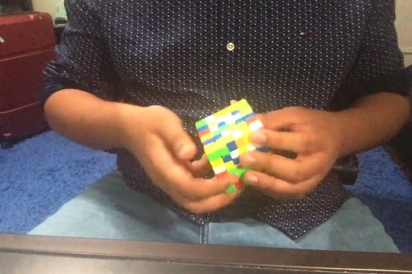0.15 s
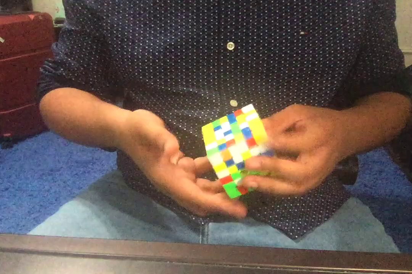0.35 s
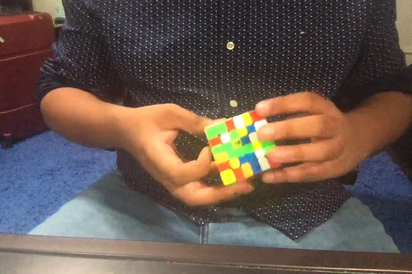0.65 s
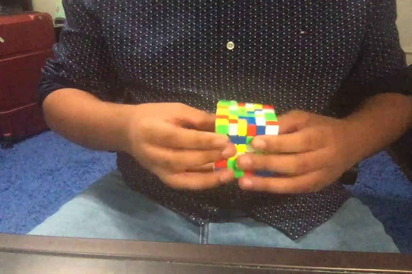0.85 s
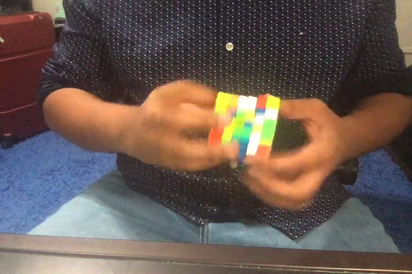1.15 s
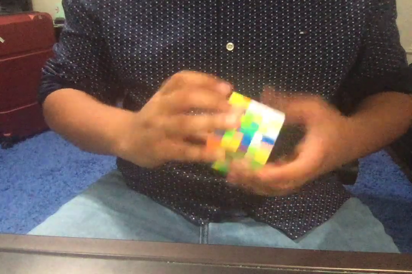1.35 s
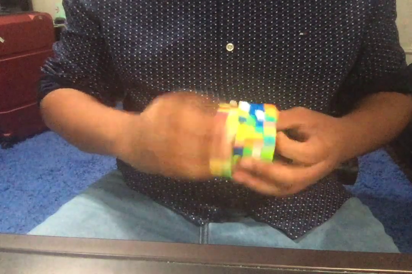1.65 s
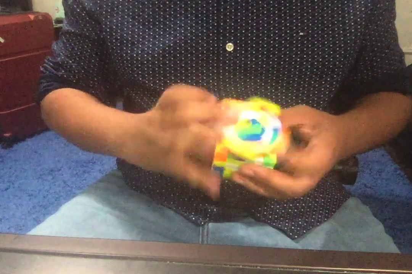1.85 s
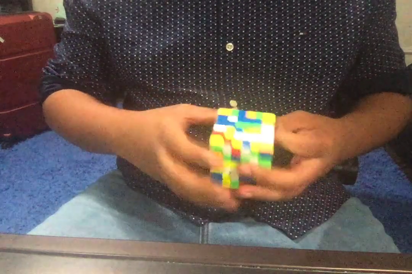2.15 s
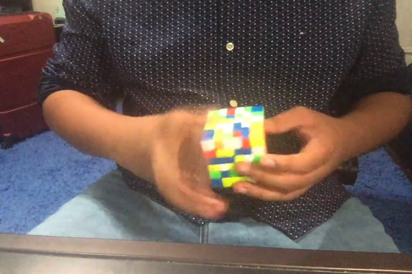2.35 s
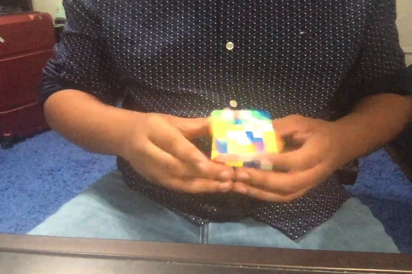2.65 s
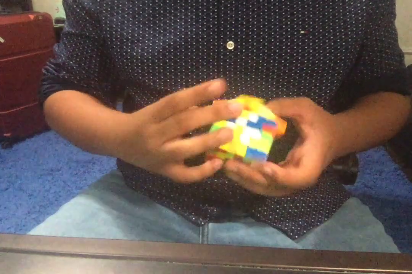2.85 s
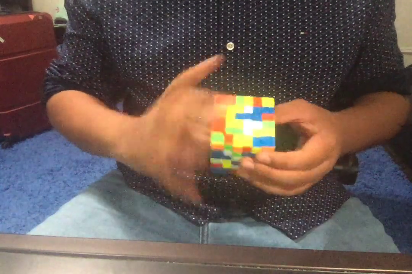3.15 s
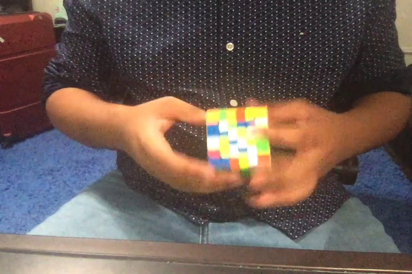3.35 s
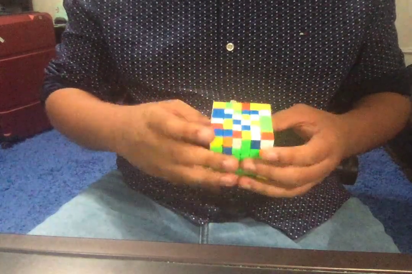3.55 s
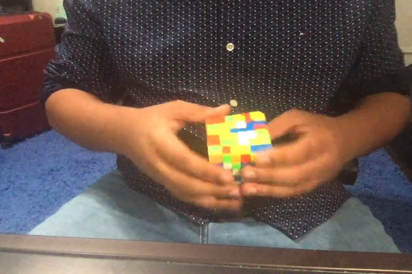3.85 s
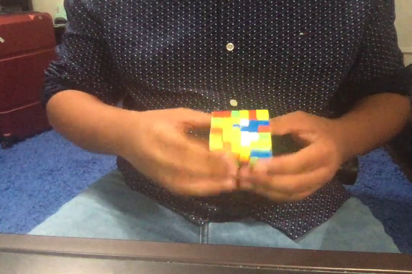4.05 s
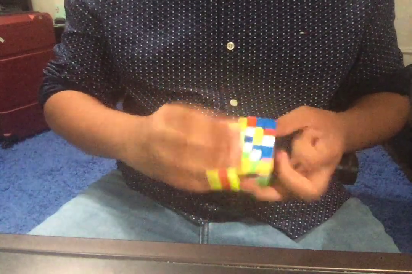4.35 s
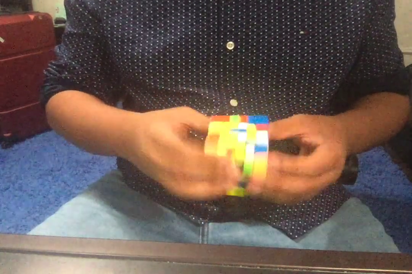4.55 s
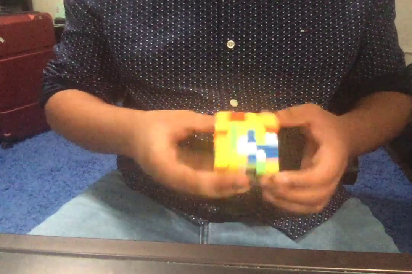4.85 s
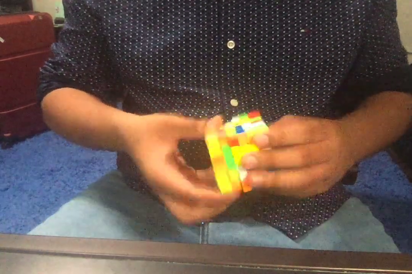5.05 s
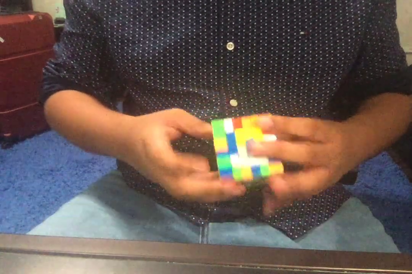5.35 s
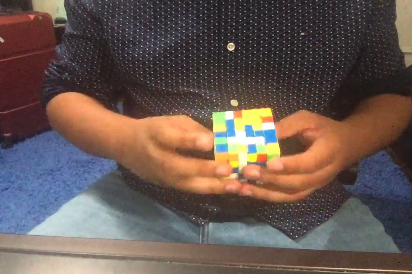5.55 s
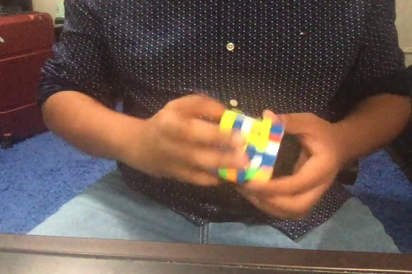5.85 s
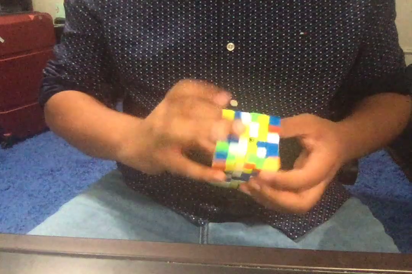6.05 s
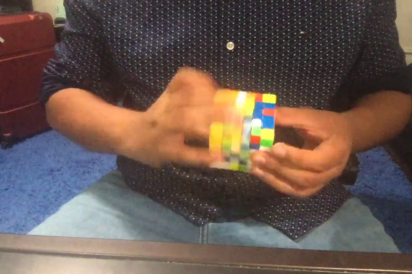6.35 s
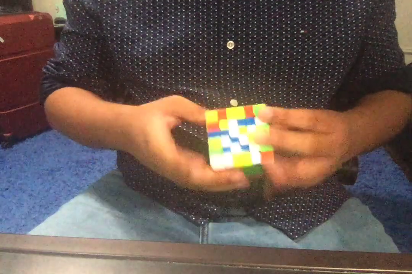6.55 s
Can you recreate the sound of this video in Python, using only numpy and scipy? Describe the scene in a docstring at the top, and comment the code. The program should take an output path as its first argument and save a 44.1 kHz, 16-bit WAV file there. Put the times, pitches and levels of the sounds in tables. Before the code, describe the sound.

Quick flurries of sharp plastic clicks and clacks come from a puzzle cube twisted close by, with a low traffic rumble outside.

```python
"""Puzzle cube and distant traffic

A plastic puzzle cube is turned fast by hand, close by in a furnished room. Each turn drags the
small pieces over one another: a dense rattle of tiny impacts, with louder snaps as pieces catch.
The edges tick, while the walls of the pieces and the air inside the cube resonate.
Far traffic comes through the walls of the room and booms in its low modes."""
import sys
import numpy as np
from scipy import signal
from scipy.fft import rfft, irfft, next_fast_len
from scipy.io import wavfile
from scipy.ndimage import map_coordinates

SR = 44100
rng = np.random.default_rng(int(sys.argv[2]) if len(sys.argv) > 2 else 0)


def to_wav(sig):
    """Store sig (one row per channel, or 1-D mono) as 16-bit WAV at the path in sys.argv[1].

    Samples outside -1..1 are clipped; the rate is SR.
    """
    pcm = np.clip(np.atleast_2d(sig), -1, 1) * 32767
    pcm = np.round(pcm).astype(np.int16)
    wavfile.write(sys.argv[1], SR, pcm.T)  # frames by channels


N = 295029

# Levels in the tables are relative: each source applies its own gains and filters.
# Turns of a layer: (time of full speed [s], hold [s], tick level [dB], shell over ticks [dB],
# core over ticks [dB], gain of the small walls as the fingers free or damp them [dB])
LAYER_TURNS = [(0.004, 0.02, -57, -4.5, -28, -5.5), (0.059, 0.034, -53, -3, -10.5, -4),
               (0.252, 0.016, -54.5, 4.5, -5.5, -3.5), (0.433, 0.0037, -47, 1.5, -6.5, -3.5),
               (0.582, 0.0022, -56, 5, -8.5, -9.5), (0.977, .015, -48.5, 1, -8.5, -8.5),
               (1.047, 0.0022, -47.5, 3.5, -4.5, -3), (1.211, 0.044, -38, -3, -12.5, -0.5),
               (1.395, .03, -80, -3, -19, -7), (1.535, .003, -61.5, 1, -18, -10.5),
               (1.686, 0.019, -50.5, 0.5, -13.5, -11), (1.778, 0.0034, -50, -4, -14, -11),
               (1.821, .004, -43, 2.5, -13.5, -7.5), (1.902, 0.022, -54.5, 0, -15.5, -8),
               (2.068, 0.0011, -61, -3, -23, -5), (2.14, 0.011, -76, 1.5, -20, -6),
               (2.233, 0.012, -79, -8, -20, -5), (2.333, 0.0041, -77.5, 4, -20, -10),
               (2.719, .012, -56, 1, -9.5, -13.5), (2.786, .022, -51.5, 2.5, -16.5, -6.5),
               (2.898, .001, -53, 0, -8, -6.5), (3.117, 0.0022, -41.5, -4.5, -12, 1.5),
               (4.115, 0.0048, -53, -0.5, -20, -5.5), (4.255, .001, -45.5, 0, -11.5, -7.5),
               (4.327, .001, -39.5, 2, -13, -8), (4.402, 0.00083, -46.5, -1, -13, -9),
               (4.609, 0.01, -53.5, 4.5, -16, -11.5), (4.757, 0.027, -66, -0.5, -8, -4),
               (4.861, .001, -44.5, 1.5, -15.5, -5.5), (5.027, 0.021, -79, -7, -18, -3),
               (5.113, 0.06, -46, -2, -6, -0.5), (5.798, 0.00086, -50.5, -2, -20, -3.5),
               (5.907, .003, -53.5, -3.5, -20, 1.5), (5.949, .001, -49, -10, -16, -4.5),
               (6.035, 0.017, -48, -0.5, -25, -3), (6.123, .005, -42.5, -3.5, -13, -11),
               (6.146, 0.032, -48, 1.5, -10.5, -6), (6.316, 0.0076, -40.5, -3, -16.5, 2),
               (6.352, 0.022, -47, 0, -18.5, -2.5)]
# Pieces catching, and lone ticks between turns: (time [s], tick level [dB], knock level [dB])
SNAP_EVENTS = [(0.0153, -38, -35.5), (0.026, -37.5, -43), (0.078, -46, -49), (0.091, -44, -49),
               (0.2407, -43, -60), (0.2491, -44, -33.5), (0.2525, -35, -33.5), (0.2675, -30, -37.5),
               (0.304, -50, -69), (0.3295, -45, -55), (0.3368, -51, -65), (0.4013, -60, -61),
               (0.42, -50, -57), (0.4313, -51, -40), (0.446, -36, -39), (0.568, -43.5, -53),
               (0.5909, -47, -47), (0.6015, -39, -48), (0.852, -66, -64), (0.9739, -38, -41.5),
               (0.983, -40, -37), (0.9928, -43, -38), (1.0188, -32.5, -35), (1.042, -41, -52),
               (1.05, -33, -44.5), (1.0684, -34, -51), (1.0973, -36.5, -48.5), (1.2055, -30.5, -38.5),
               (1.2138, -26.5, -33), (1.216, -32.5, -31.5), (1.2268, -25.5, -32.5), (1.242, -24.5, -39),
               (1.389, -68, -60), (1.4137, -65, -61.5), (1.5356, -56.5, -47), (1.5571, -43.5, -39.5),
               (1.5931, -49, -48), (1.6412, -52, -49), (1.674, -54, -66), (1.6868, -26, -37),
               (1.691, -38, -59), (1.7026, -34, -33.5), (1.777, -43, -51), (1.805, -47, -35),
               (1.8255, -32, -37), (1.8286, -33, -33), (1.8435, -38, -35), (1.8473, -41, -34),
               (1.892, -35.5, -57), (1.92, -34.5, -29.5), (1.9413, -39, -43), (1.975, -54, -60),
               (1.983, -53, -62), (2.0634, -42.5, -71), (2.0753, -59.5, -40), (2.1016, -50, -69),
               (2.142, -57, -58), (2.2302, -57.5, -66), (2.2474, -61.5, -69), (2.3337, -58.5, -50.5),
               (2.701, -59, -62), (2.722, -59, -36), (2.7292, -38.5, -43), (2.7487, -46, -65),
               (2.758, -53, -36), (2.776, -42.5, -46), (2.786, -38.5, -42), (2.7983, -57, -37.5),
               (2.8081, -35, -35), (2.8115, -33.5, -34), (2.8758, -53, -52), (2.8934, -36, -50),
               (2.9086, -36, -36.5), (3.018, -65, -70), (3.086, -38.5, -51), (3.1, -43, -60),
               (3.1157, -37, -37.5), (3.1232, -35.5, -34.5), (3.1258, -23, -39), (3.3633, -49, -60),
               (3.4433, -68.5, -62), (4.099, -61, -71), (4.1081, -42, -69), (4.1148, -37, -43.5),
               (4.1354, -42, -68), (4.1452, -39, -46), (4.1712, -36.5, -38.5), (4.2427, -42, -56),
               (4.251, -40.5, -37.5), (4.2646, -38, -35), (4.3113, -53, -73), (4.3231, -35.5, -29),
               (4.332, -34.5, -40), (4.3364, -32.5, -48), (4.3962, -52, -36.5), (4.409, -28.5, -44),
               (4.604, -53, -48), (4.611, -49, -47), (4.6985, -57.5, -59), (4.7356, -54.5, -57),
               (4.7714, -45, -47.5), (4.7893, -53.5, -53), (4.8505, -37, -46), (4.8631, -32, -37),
               (5.006, -60, -68), (5.0297, -53.5, -60), (5.0567, -53.5, -78), (5.0982, -47, -58),
               (5.119, -31.5, -38), (5.1344, -42, -34), (5.15, -26.5, -34), (5.155, -36, -65),
               (5.1707, -36, -43), (5.1787, -33, -38.5), (5.4063, -58.5, -68), (5.7227, -57, -72),
               (5.791, -43.5, -54), (5.8037, -58, -44), (5.8159, -40, -56), (5.8974, -48, -59),
               (5.912, -39, -57), (5.932, -41, -50), (5.9536, -34.5, -38), (6.0243, -34.5, -47.5),
               (6.0564, -47, -46), (6.073, -44, -49), (6.117, -24.5, -31), (6.1736, -44, -41),
               (6.178, -28.5, -37), (6.1918, -34, -45), (6.2306, -58, -53.5), (6.258, -28.5, -45.5),
               (6.3123, -29, -54), (6.3254, -24, -36.5), (6.3535, -24, -48), (6.3603, -35, -39.5),
               (6.6468, -71.5, -84.5)]
# Spectrum of the ticking edges: (frequency [Hz], level [dB])
EDGE_SPECTRUM = [(1500, -90), (5000, -28.5), (6800, -11.5), (8500, -10), (9800, 0.5), (10800, -2.5),
                 (12200, 4.5), (15600, 0.5), (16000, -28.5), (16800, -42.5)]
# Modes of the shell, the walls of the pieces: (frequency [Hz], width per filter stage [Hz], level [dB])
SHELL_MODES = [(3030, 1250, -8.5), (3705, 937, -2), (4824, 1410, -3), (5810, 1700, -9.5)]
# Modes of the core, the air in the cube: (frequency [Hz], width per filter stage [Hz], level [dB])
CORE_MODES = [(1347, 850, -11), (1528, 720, -2), (2007, 1200, -3.5)]
# Echoes from near surfaces: (delay [s], level [dB])
REFLECTIONS = [(.0018, -14.5), (.0043, -12), (.0071, -34)]
# Reverberation of the room: (frequency [Hz], time to fall 60 dB [s])
REVERB_TIMES = [(1000, 0.16), (3500, 0.22), (8000, 0.24), (15000, 0.085)]
# Course of the traffic: (time [s], boom level [dB], deep boom level [dB], tyre roar level [dB])
TRAFFIC_LEVELS = [(0.0, -67, -79, -72), (0.97, -71, -80, -76), (1.1, -69, -78, -73.5),
                  (1.9, -67, -71.5, -70.5), (2.44, -67, -73.5, -74), (2.7, -72.5, -83.5, -79),
                  (2.8, -66, -74, -70), (3.32, -60.5, -75.5, -71), (3.5, -50.5, -57.5, -73),
                  (3.72, -63.5, -75, -77.5), (4.08, -68, -81, -76.5), (4.3, -63.5, -67, -69),
                  (5.18, -62, -66, -69.5), (5.72, -65.5, -72.5, -77.5), (6.12, -49.5, -56, -69),
                  (6.19, -66, -62.5, -69.5), (6.47, -50.5, -56, -70.5), (6.69, -57.5, -62.5, -75)]
# Low room modes: (frequency [Hz], width [Hz], level [dB])
BOOM_MODES = [(168, 26, -7.5), (179.9, 12.3, 2), (208.4, 5.3, -3.5), (223, 14.7, -4)]
# Lowest room modes: (frequency [Hz], width [Hz], level [dB])
DEEP_MODES = [(60, 17, -13.5), (91.2, 58, -16), (121.8, 12, 2.5)]
# Spectrum of the tyre roar: (frequency [Hz], spectral density level [dB])
TYRE_SPECTRUM = [(150, -12), (260, -7), (349, -8.5), (444, -2), (565, -17.5), (884, -8.5), (1110, -12),
                 (1950, -14.5), (2320, -16.5), (3570, -22), (7120, -34.5), (9540, -46.5), (11500, -40.5),
                 (16000, -49)]
# A vehicle pulling away: (time [s], firing frequency [Hz], level [dB], second harmonic level [dB])
ENGINE_TRACK = [(2.72, 72.3, -86, -77), (2.886, 74.3, -81.5, -74.5), (3.556, 78.04, -71, -56),
                (4.0, 80.6, -89, -72.5)]
# Gears of a passing car: (time [s], frequency [Hz], level [dB])
GEAR_TRACK = [(4.3, 930, -100), (4.4, 918, -80), (5.3, 892, -82), (5.7, 850, -100)]

RISE_DB_PER_S = 1299.5  # a finger flicks the layer up to speed
# As the layer slows, the lower-pitched parts die away later.
EDGE_FALL_DB_PER_S, SHELL_FALL_DB_PER_S, CORE_FALL_DB_PER_S = 539.5, 463.5, 379.5
BAND_LIMIT_HZ = 16900


def turns():
    """Sliding contact: the rattle follows the force of each turn and dies between turns."""
    _, _, tick_db, shell_db, core_db, _ = np.transpose(LAYER_TURNS)
    ticks = rattle(per_s=1100, spread_db=3.5, t60=0.0032, rub=0.1)
    shell = rattle(per_s=300, spread_db=3, t60=0.004, rub=0.5)
    core = rattle(per_s=150, spread_db=-5, t60=0.0079, rub=0.8)
    return cube_body(turn_force(tick_db, EDGE_FALL_DB_PER_S) * ticks,
                     turn_force(tick_db + shell_db, SHELL_FALL_DB_PER_S) * shell,
                     turn_force(tick_db + core_db, CORE_FALL_DB_PER_S) * core)


def turn_force(levels_db, fall_db_per_s):
    """Superposed envelopes: each turn grows exponentially, holds, then decays exponentially."""
    lead = SR // 10
    force, t = np.zeros(N + SR), np.arange(-lead, SR // 2) / SR
    rise_db = RISE_DB_PER_S * np.minimum(t, 0)
    for (time, hold, *_), db in zip(LAYER_TURNS, levels_db):
        fall_db = fall_db_per_s * np.maximum(t - hold, 0)
        force[round(time * SR):][:len(t)] += amp(db + rise_db - fall_db)
    return force[lead:][:N]


def rattle(per_s, spread_db, t60, rub):
    """Shot noise: random impacts of uneven strength, over the steady friction of sliding faces."""
    hits = rng.random(N) < per_s / SR
    strength = amp(spread_db * np.minimum(rng.exponential(size=N), 2))
    impacts = unit(chatter(hits * strength, t60))
    return unit(impacts + rub * rng.standard_normal(N))


def snaps():
    """Impulse excitation: a catching piece gives a tick and a sharp blow, and both chatter on."""
    times, tick_db, knock_db = np.transpose(SNAP_EVENTS)
    onsets = np.round(times * SR).astype(int)
    tick = np.bincount(onsets, amp(tick_db), N)
    knock = np.bincount(onsets, amp(knock_db), N)
    shell = amp(11.5) * knock + amp(-1.5) * chatter(knock, t60=0.0092)
    edges = amp(6.5) * tick + chatter(tick, t60=0.0068)
    core_share_db = turn_setting(column=4) - turn_setting(column=3)  # core over shell, as in the rattle
    core = amp(np.minimum(core_share_db, -6)) * shell
    return amp(-2.5) * cube_body(edges, shell, core)


def chatter(blows, t60):
    """Exponential decay: each blow starts a noise burst that falls 60 dB in t60 seconds."""
    decay = amp(-60 * np.arange(SR // 20) / SR / t60)
    return signal.fftconvolve(blows, decay)[:N] * np.sign(rng.standard_normal(N))


def cube_body(ticks, shell, core):
    """Source and filter: sharp edges tick highest, the walls knock, the hollow core answers lowest."""
    walls = ringing(shell, SHELL_MODES, waver_db=3.0, grip_db=turn_setting(column=5))
    cavity = ringing(core, CORE_MODES, waver_db=1.5)
    edges = filtered(ticks, lambda f: amp(log_interp(EDGE_SPECTRUM, f)))
    return edges + amp(-2) * (walls + cavity)


def ringing(drive, table, waver_db, grip_db=0):
    """Forced resonance: mode levels waver as loose pieces shift; the small walls follow the grip."""
    sound = np.zeros(N)
    for k, (hz, width, db) in enumerate(table):
        small_wall = hz > 4500
        gain = amp(db + waver_db * wobble(30) + grip_db * small_wall)
        sound += (-1) ** k * gain * filtered(drive, bandpass(hz, width, stages=3))
    return sound


def turn_setting(column):
    """Sample and hold: a column of LAYER_TURNS, stepping 30 ms before each turn reaches full speed."""
    table = np.array(LAYER_TURNS)
    current = np.searchsorted(table[:, 0] - 0.03, np.arange(N) / SR) - 1
    return table[np.maximum(current, 0), column]


def room(x):
    """Reflection and absorption: near surfaces echo, then each frequency decays at its own rate."""
    early = sum(amp(db) * np.pad(x, (round(delay * SR), 0))[:N] for delay, db in REFLECTIONS)
    hz, t, noise = signal.stft(rng.standard_normal(SR // 2), SR, nperseg=256)
    decay = amp(-60 * t / log_interp(REVERB_TIMES, hz)[:, None])
    tail = signal.istft(noise * decay, SR, nperseg=256)[1]
    late = signal.fftconvolve(np.pad(x, (200, 0)), tail / np.linalg.norm(tail))[:N]
    return x + early + amp(-14) * late


def traffic():
    """Standing waves: engine noise booms in the room modes, while tyre roar swells as cars pass."""
    boom_db, deep_db, roar_db = curves(TRAFFIC_LEVELS)
    boom = filtered(amp(1.3 * wobble(11)) * rng.standard_normal(N), modes(BOOM_MODES))
    boom = filtered(boom, bandpass(hz=185, width=150, stages=2))
    deep = filtered(rng.standard_normal(N), modes(DEEP_MODES))
    deep = filtered(deep, bandpass(hz=100, width=150, stages=2))
    tyre_noise = amp(0.47 * wobble(9)) * rng.standard_normal(N)
    roar = filtered(tyre_noise, lambda f: amp(log_interp(TYRE_SPECTRUM, f)))
    return amp(boom_db - 1) * unit(boom) + amp(deep_db) * unit(deep) + amp(roar_db + 3.5) * unit(roar)


def engine():
    """Periodic firing: a fundamental and its octave rise in pitch as a vehicle pulls away."""
    firing_hz, db, octave_db = curves(ENGINE_TRACK)
    return tone(firing_hz, db, waver_db=-1.0) + tone(2 * firing_hz, octave_db, waver_db=0.0)


def gears():
    """Gear meshing: a passing car gives a faint, falling whine."""
    hz, db = curves(GEAR_TRACK)
    return tone(hz, db, waver_db=4)


def tone(hz, db, waver_db):
    """Random modulation: a sine whose level and phase both wander in proportion to waver_db."""
    level = amp(db + waver_db * wobble(12))
    phase = 2 * np.pi * np.cumsum(hz) / SR + 0.3 * waver_db * wobble(12)
    return np.sqrt(2) * level * np.sin(phase)


def bandpass(hz, width, stages=1):
    """Damped resonator response; stages in cascade make the band narrower and steeper."""
    return lambda f: (1j * f * width / (hz * hz - f * f + 1j * f * width)) ** stages


def modes(table):
    """Modal superposition: the responses of damped resonators add with alternating sign."""
    return lambda f: sum((-1) ** k * amp(db) * bandpass(hz, width)(f)
                         for k, (hz, width, db) in enumerate(table))


def filtered(x, response):
    """Linear filtering by a frequency response, scaled to conserve the power of white noise."""
    size = next_fast_len(N + SR // 2)
    gain = unit(response(np.fft.rfftfreq(size, 1 / SR)))
    return irfft(rfft(x, size) * gain, size)[..., :N]


def wobble(per_s):
    """Smooth fluctuation: a spline through per_s random values a second."""
    knots = rng.standard_normal(int(N * per_s / SR) + 4)
    return map_coordinates(knots, [np.arange(N) * per_s / SR])


def curves(table):
    """Linear interpolation in time: one value per sample for each column after the first."""
    times, *columns = np.transpose(table)
    return [np.interp(np.arange(N) / SR, times, column) for column in columns]


def log_interp(points, hz):
    """Interpolation of (frequency [Hz], value) points on a logarithmic frequency axis."""
    frequencies, values = np.transpose(points)
    return np.interp(np.log(hz + 1), np.log(frequencies + 1), values)


def amp(db):
    """Amplitude ratio of a level in decibels."""
    return 10 ** (np.asarray(db) / 20)


def unit(x):
    """Normalisation to an rms of 1."""
    return x / np.sqrt(np.mean(np.abs(x) ** 2) + 1e-20)


def scene():
    """Superposition: the cube in the room and the traffic beyond it add in one channel."""
    return (room(turns() + snaps()) + traffic() + gears() + engine())[None]


def record(dry):
    """Band limiting: an ideal low-pass filter passes only what lies below BAND_LIMIT_HZ."""
    size = next_fast_len(N + SR // 2)
    passband = np.fft.rfftfreq(size, 1 / SR) < BAND_LIMIT_HZ
    return irfft(rfft(dry, size) * passband, size)[..., :N]


dry = scene()
out = record(dry)
to_wav(out)
```